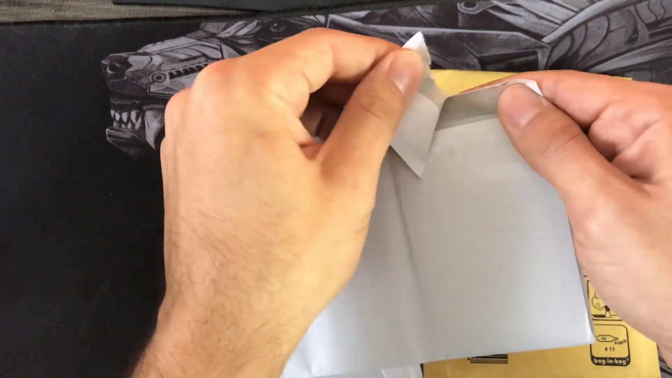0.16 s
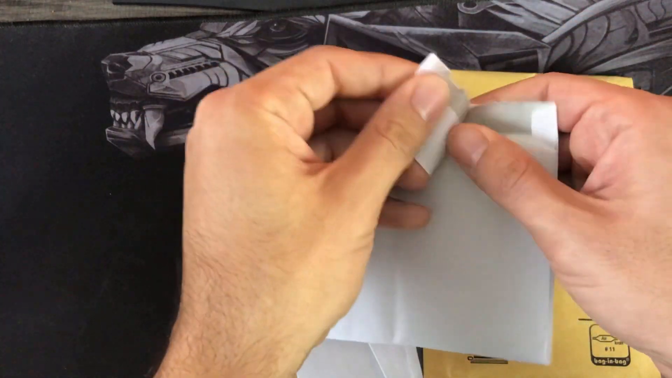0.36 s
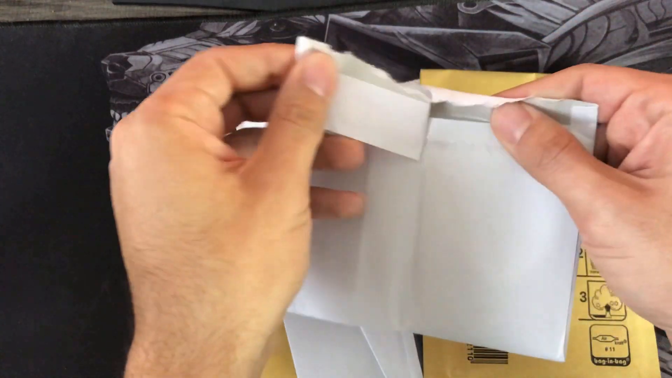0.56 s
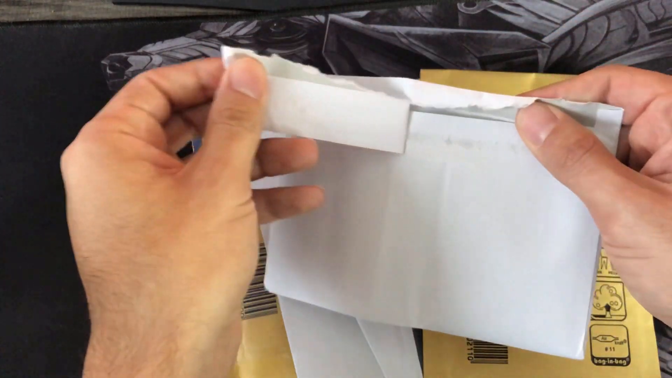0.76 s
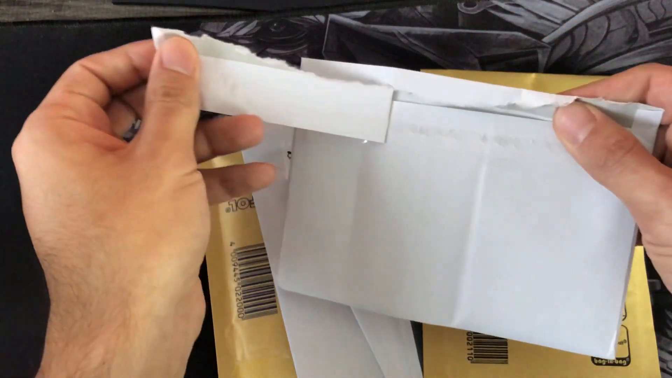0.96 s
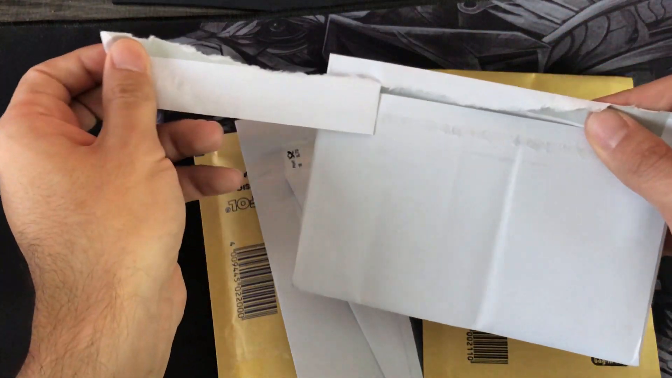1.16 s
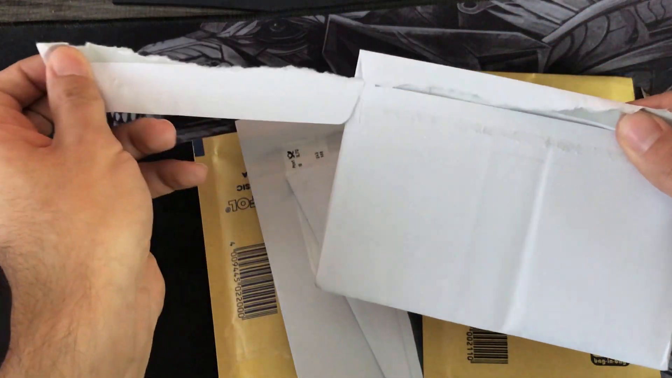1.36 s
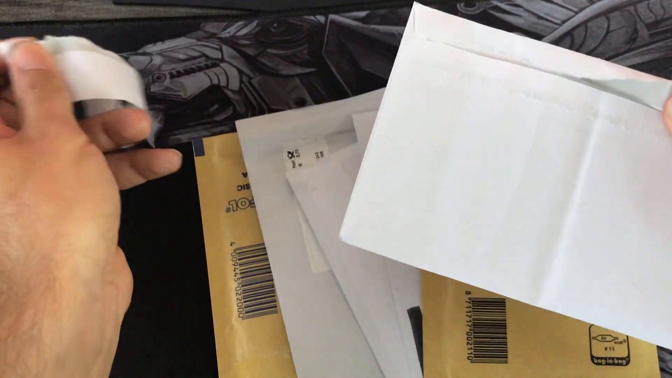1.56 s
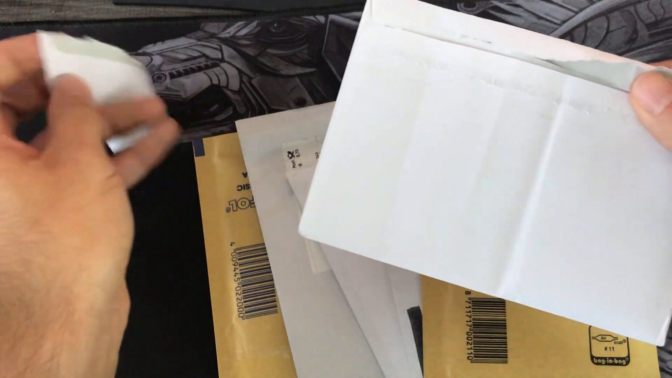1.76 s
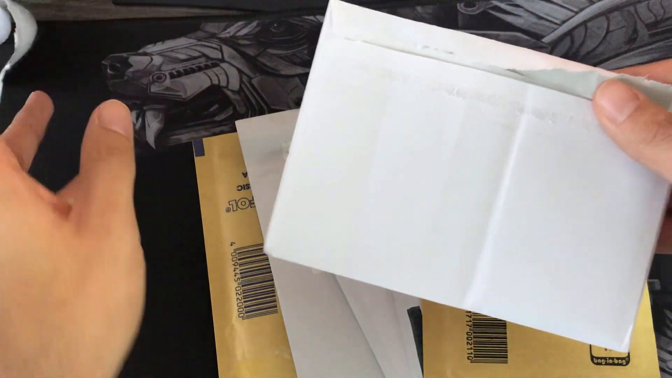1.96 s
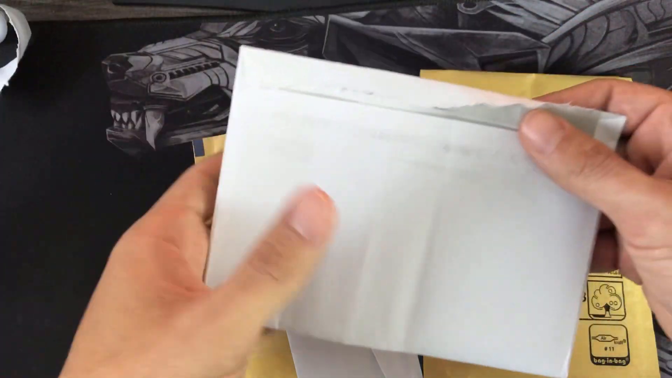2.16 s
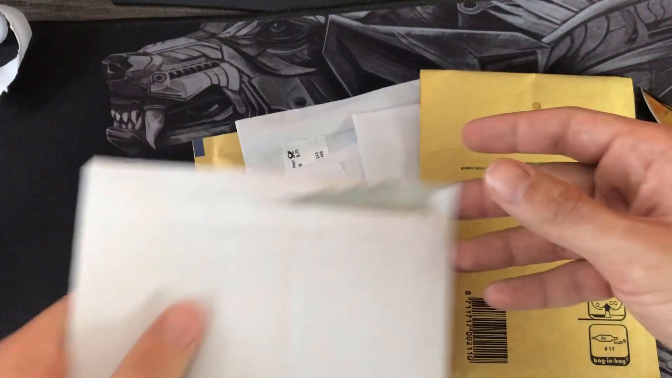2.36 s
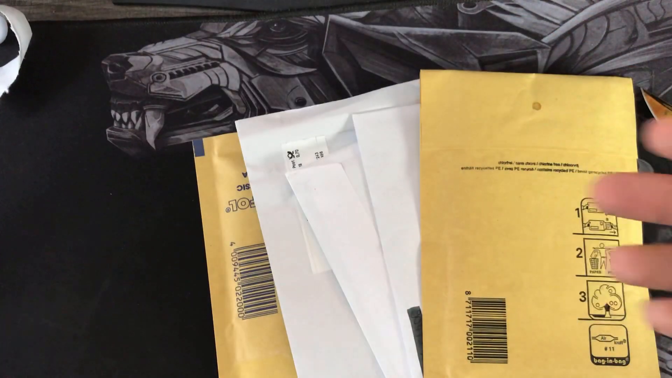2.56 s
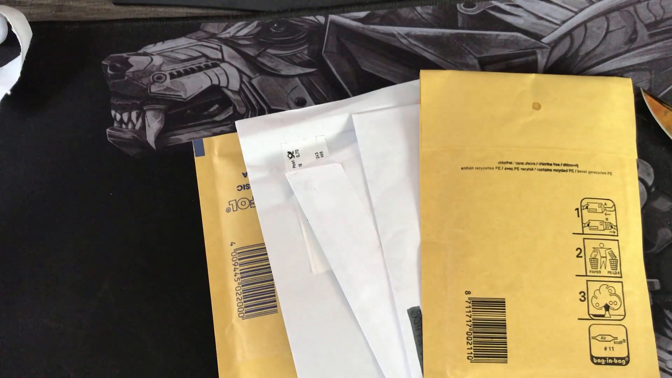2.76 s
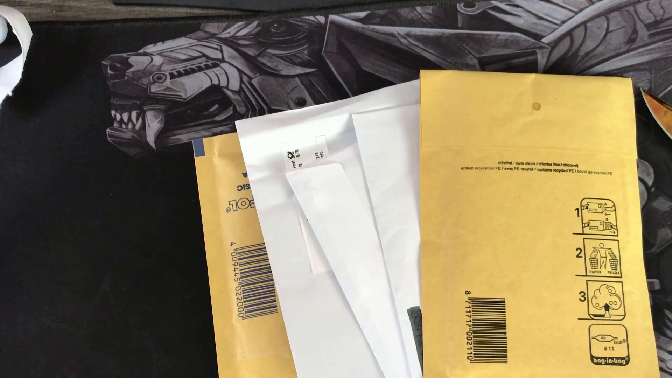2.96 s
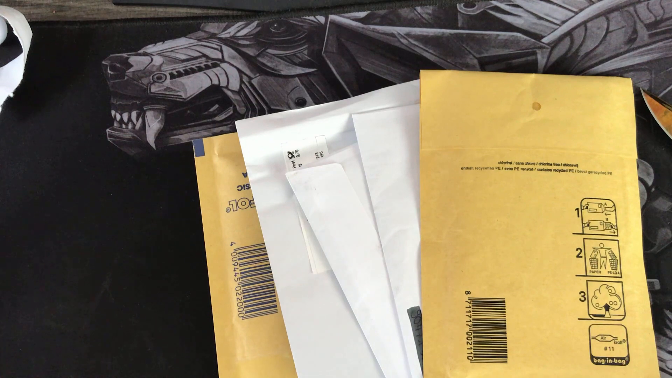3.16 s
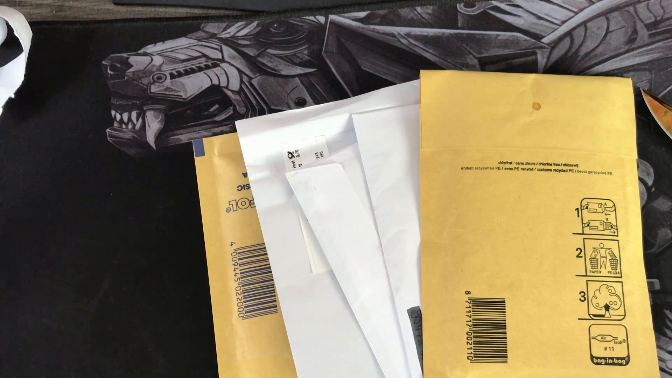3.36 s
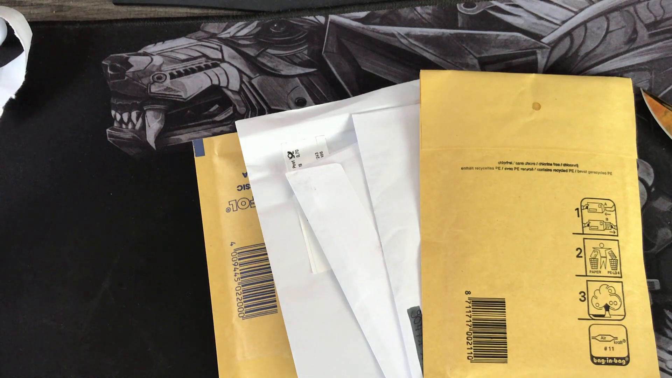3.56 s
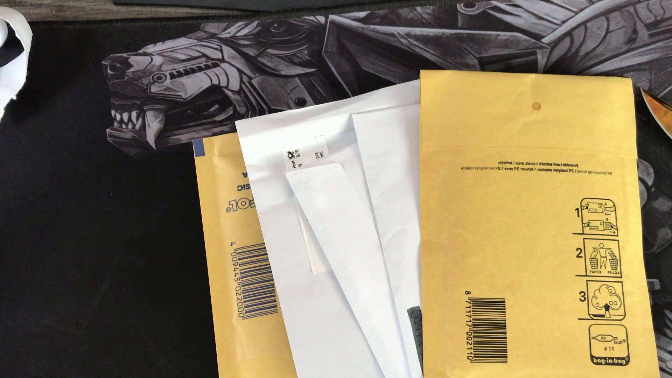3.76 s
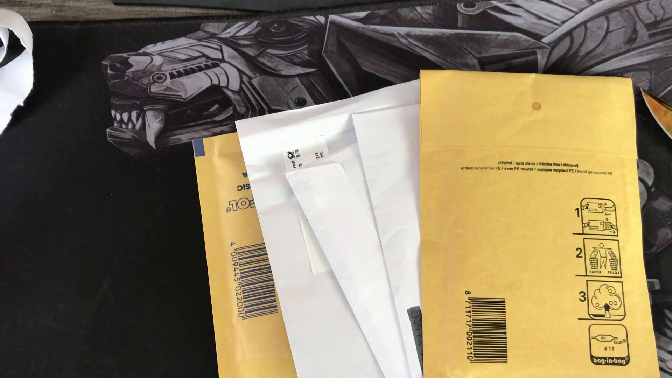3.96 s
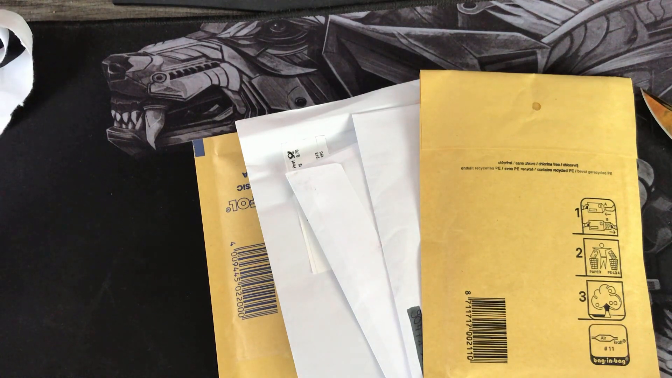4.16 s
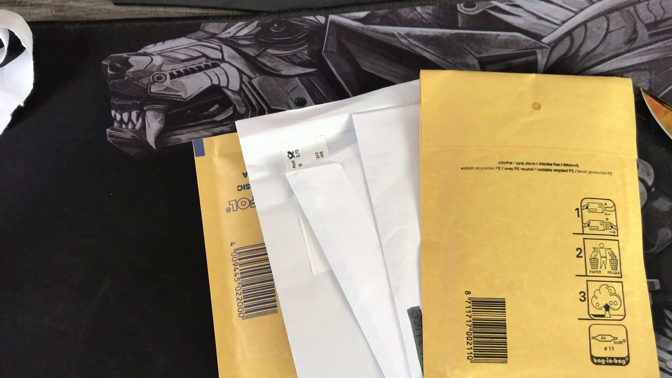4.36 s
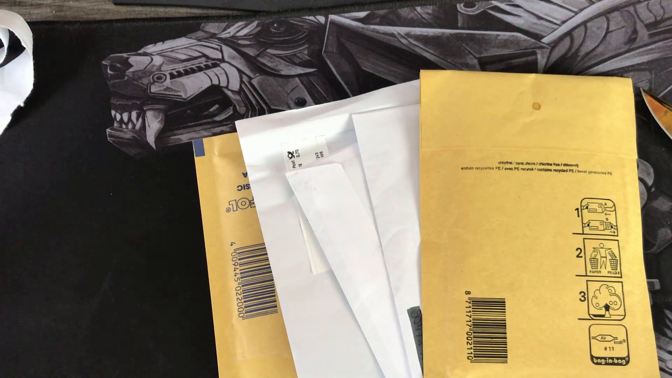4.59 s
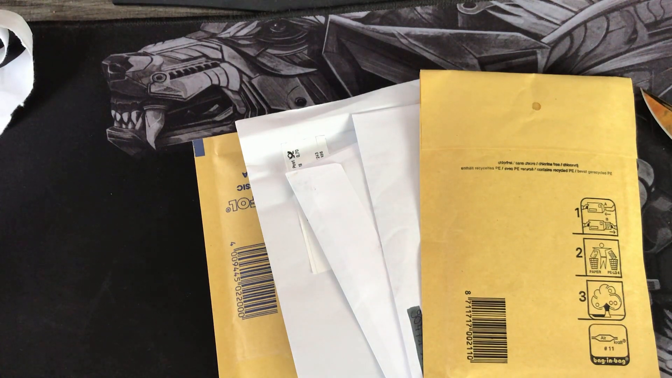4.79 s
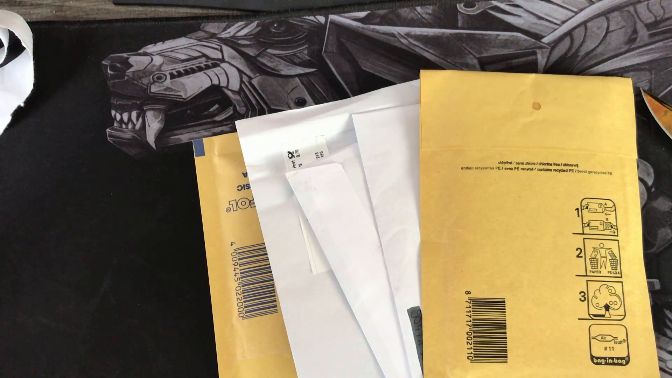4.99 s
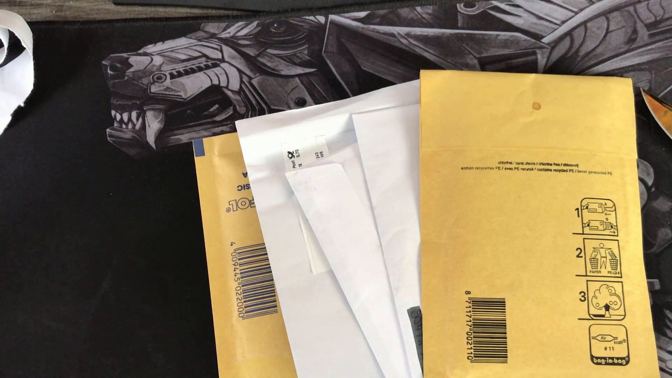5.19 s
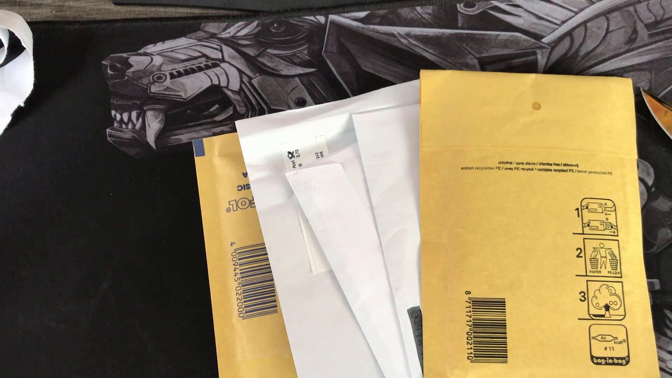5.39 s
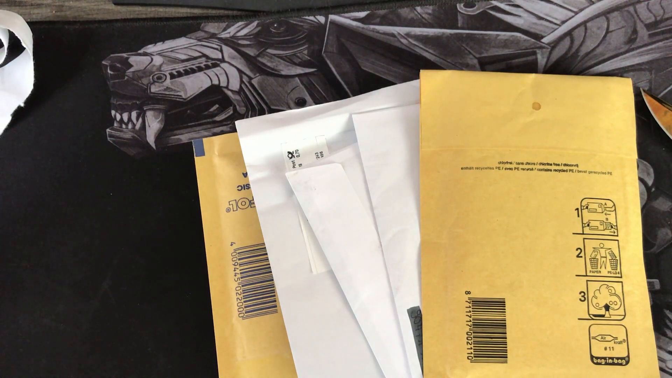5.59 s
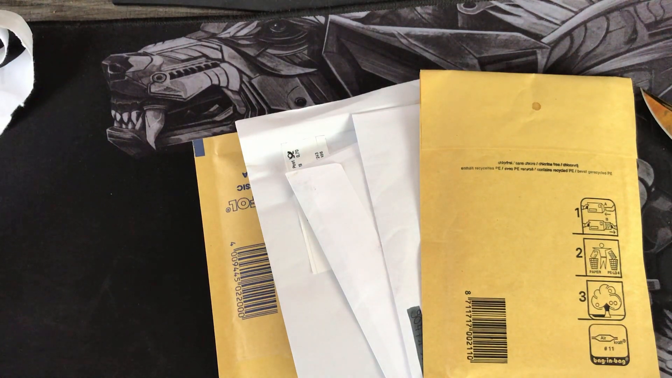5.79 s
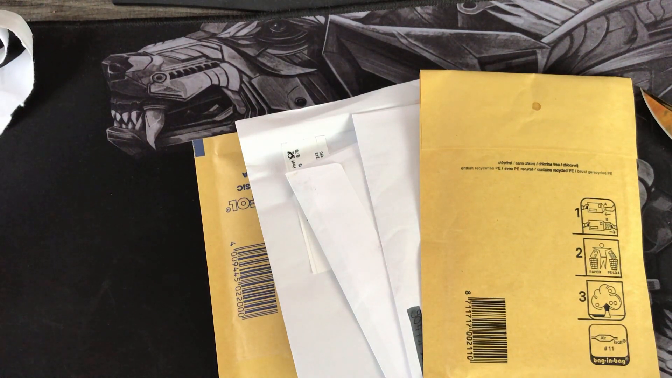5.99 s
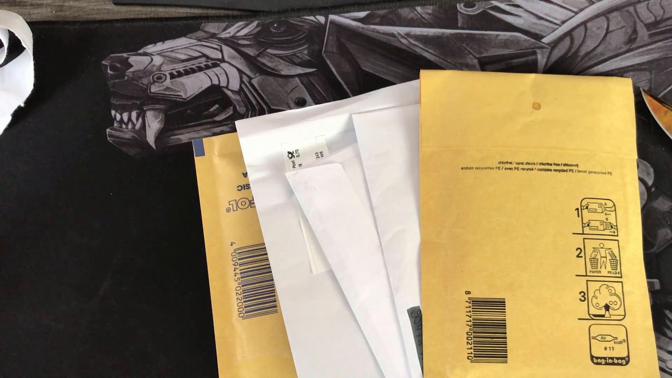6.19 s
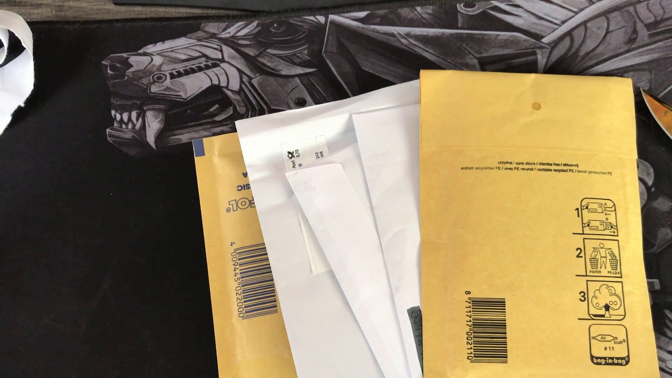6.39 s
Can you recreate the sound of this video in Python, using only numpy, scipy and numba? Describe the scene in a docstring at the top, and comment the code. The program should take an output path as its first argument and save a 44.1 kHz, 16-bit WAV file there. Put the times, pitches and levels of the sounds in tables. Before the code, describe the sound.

A paper envelope flap is torn off in two crackling pulls, then the paper is slid, turned and creased with crisp rustles in a quiet room.

```python
"""On a desk in a small quiet room, the flap of a paper envelope is torn off in two pulls,
with a phone lying there too; then the envelope is turned, slid and creased.
Tearing is a dense crackle of random snaps that rings the loose flap; sliding is smooth hiss with crinkle.
Creases crack in short ringing rattles, hands shake the desk in low sway and jolts,
and the room adds a steady hush and fading echoes."""
import sys
import numpy as np
from scipy import signal
from scipy.fft import rfft, irfft, next_fast_len
from scipy.io import wavfile
from scipy.ndimage import uniform_filter1d
from numba import njit

SR = 44100
rng = np.random.default_rng(int(sys.argv[2]) if len(sys.argv) > 2 else 0)


def unload_wav(signal):
    """Save mono or channel-first audio to the path in sys.argv[1] as 16-bit WAV at rate SR, clipped to [-1, 1]."""
    wavfile.write(
        sys.argv[1],
        SR,
        np.round(np.clip(np.atleast_2d(signal).T, -1, 1) * 32767).astype(np.int16),
    )


N = 284004

# tone balance of the steady room hush: pitch_hz, relative_level_db (per Hz)
HUSH_COLOUR = [(40, -25.5), (70, -5), (150, -3.5), (280, 2), (550, -10.5), (830, -9), (1500, -13),
               (2600, -15.5), (6000, -23.5), (11000, -22.5), (16000, -21.5)]
HUSH_DB = -72.5

# slow sway of the desk under the arms: time_s, level_db
DESK_SWAY = [(0.0, -86), (0.03, -63), (0.18, -54), (0.29, -58), (1.2, -69.5), (2.35, -55), (2.39, -63),
             (2.69, -51.5), (3.26, -68), (4.03, -64.5), (4.41, -72.5), (4.88, -53.5), (4.97, -66.5),
             (5.09, -52), (5.2, -66), (5.35, -59.5), (6.42, -66), (6.44, -74)]
# hands jolting the desk: time_s, push_db (before the desk rings), push_length_ms
DESK_JOLTS = [(0.164, -45, 8.3), (0.254, -57, 9), (0.61, -49.5, 12), (1.067, -54, 11), (1.378, -59.5, 10),
              (2.335, -47, 14), (2.563, -47, 8.8), (2.689, -48.5, 13), (3.136, -55, 9.7), (3.51, -53.5, 6),
              (3.691, -63, 11), (3.827, -59, 5), (4.059, -57, 20), (4.838, -44.5, 16), (4.897, -48.5, 12),
              (4.964, -47, 4.9), (5.088, -43, 14), (5.201, -45, 7), (5.312, -54, 9.3), (5.425, -42.5, 12),
              (5.565, -49, 10), (5.676, -48, 6.4), (5.744, -45, 8), (5.853, -45, 9), (5.913, -48, 7.6),
              (6.011, -44.5, 8.8), (6.121, -48, 6.6), (6.409, -46.5, 6.4)]
# shudder around a jolt: seconds to rise and fall by 20 dB, dB relative to the push
SHUDDER_RISE_S, SHUDDER_FALL_S, SHUDDER_DB = 0.06, 0.091, -13.5
RUMBLE_DB = -76.5  # steady

# sheets rubbing, one row a stroke: loudest_s, hiss_db (skin on paper), crinkle_db (sheet),
# rise_s, fall_s (times for 20 dB)
PAPER_STROKES = [(0.02, -75.5, -71, 1, 0.15), (0.135, -68.5, -79, 0.4, .03), (0.435, -66.5, -71, 0.1, 0.2),
                 (0.52, -64.5, -65, 0.15, 0.7), (1.68, -75.5, -94, 0.1, 0.3), (1.786, -75, -77, 0.1, 0.23),
                 (1.936, -65.5, -75, 0.06, 0.15), (2.309, -68, -62.5, 0, 0.08),
                 (2.35, -69.5, -69.5, -0.02, 0.15), (2.46, -67.5, -74.5, 0.18, 0.08),
                 (2.544, -66.5, -65.5, -0.04, 0.2), (2.574, -67, -62, .08, 0.07),
                 (2.82, -68, -74, 0.24, -0.04), (2.888, -81, -66, 0.3, 0.14),
                 (2.957, -73, -68.5, 0.15, 0.25), (3.12, -71, -78, 0.07, 0.4), (3.174, -71, -61, 0.1, 0.09),
                 (3.497, -66, -63, 0.08, .1), (3.57, -65, -73, 0, 0.5), (3.824, -66, -74, -0.1, 0.18),
                 (3.954, -64.5, -71, 0.02, 0.5), (4.244, -65, -60, 0.12, 0.14),
                 (4.522, -78, -78.5, .1, .12), (4.64, -78, -76.5, -0.2, 0.18),
                 (4.794, -85, -62, 0.03, 0.13), (4.845, -56, -58, .01, 0.18), (4.95, -70, -59, .03, 0.17),
                 (5.058, -62.5, -62, 0.04, 0.2), (5.2, -66.5, -60, 0.11, 0.08),
                 (5.24, -62.5, -61.5, .04, 0.13), (5.422, -61.5, -58.5, 0.1, .1),
                 (5.53, -71, -65, 0.07, 0.35), (5.644, -65.5, -66, .05, -0.1),
                 (5.765, -66.5, -57.5, 0.22, 0.18), (5.868, -57, -56.5, -0.02, .04),
                 (5.912, -70, -58, 0.05, 0.18), (6.02, -62.5, -61.5, .2, 0.23),
                 (6.104, -69, -55.5, 0.12, 0.13), (6.17, -65.5, -72, 0.04, .05),
                 (6.28, -57, -56, 0.08, 0.04), (6.33, -70, -72, 0.4, 0.8), (6.429, -57, -59, 0.05, 1)]
# a crinkle is quicker than its hiss: shares of the stroke's rise and fall times
CRINKLE_RISE, CRINKLE_FALL = 0.48, 0.8
# pitches at which a sheet rings: pitch_hz, width_hz, level_db
SHEET_RINGS = [(1844, 200, -2.5), (2950, 140, -1.5), (3560, 290, -7)]

ROOM_T60_S, ROOM_WET_DB = 0.34, -13.5  # time for echoes to fade by 60 dB, echo level
ROOM_CENTRE_HZ, ROOM_WIDTH_HZ = 3500, 14000  # broad band that dulls the echoes

# creases cracking: start_s, peak_db (of the ring), ring_hz, treble_db and knock_db (relative to peak_db),
# ring_width (share of ring_hz)
CREASE_CRACKS = [(0.162, -25, 6300, 6, -22.5, 1.1), (0.433, -44.5, 2960, 2, -27, 0.36),
                 (0.502, -60, 4230, -9, -8, 0.8), (0.532, -30.5, 4600, -18, -14, 0.6),
                 (1.508, -43, 1650, 2, -9, 1.1), (1.728, -55, 2300, -22, -7, 0.55),
                 (1.758, -58.5, 1110, -11, -1, 0.9), (2.309, -49, 1220, -5, -1, 1.7),
                 (2.316, -57, 1170, -14, 2, 0.8), (2.343, -56.5, 829, -4, -19, 0.8),
                 (2.48, -58.5, 1600, -13, -21, 0.69), (2.54, -45, 1170, -4, -6, 0.54),
                 (2.864, -61, 3830, -13, 0, 0.8), (2.94, -54, 3920, -14, -6, 0.64),
                 (2.999, -55, 1600, -23, -5, 0.8), (3.045, -48, 1850, -19, -2, 0.8),
                 (3.095, -62.5, 929, -4, 11.5, 0.79), (3.133, -41.5, 3200, -8, -8, 0.52),
                 (3.15, -29, 3380, -18, -17, 1.1), (3.184, -48, 1350, -0.5, -1.5, 0.52),
                 (3.312, -61, 2400, 3, -22, 0.61), (3.495, -48.5, 2900, 3, -6.5, 0.56),
                 (3.508, -48.5, 1370, 6, -16, 0.88), (3.554, -46, 3940, -8, -8, 0.8),
                 (3.824, -51, 1970, -2, -23, 1.2), (4.014, -54, 3530, 4, -23, 0.8),
                 (4.04, -49.5, 1810, -15, -14, 0.63), (4.065, -54, 5160, -1, -6.5, 1),
                 (4.239, -41.5, 1700, -4, -11.5, 1.0), (4.285, -50.5, 3310, -18, -9, 0.8),
                 (4.672, -58.5, 2950, -18, -3, 0.67), (4.789, -41, 1350, -30, -4, 0.61),
                 (4.833, -25.5, 3000, -3, -17.5, 1.4), (4.949, -33, 1420, -12, -9.5, 0.44),
                 (4.958, -30, 3050, -19, -8, 1), (5.09, -46.5, 1790, -6.5, 1.5, 0.61),
                 (5.198, -35.5, 1860, -35, -9.5, 0.3), (5.234, -47, 1700, -20, -5, 0.8),
                 (5.312, -49, 2150, -22.5, -21, 0.92), (5.416, -50, 2050, 5, -21, 0.71),
                 (5.449, -47.5, 2340, -2, -10, 0.5), (5.634, -50.5, 3060, -11, -9, 0.66),
                 (5.762, -43.5, 1850, -12, -0.5, 0.74), (5.867, -44, 6900, 3.5, -9, 0.79),
                 (5.907, -32.5, 2360, -38, -16, 0.44), (5.949, -44, 1240, -19, -7, 1),
                 (6.036, -51, 1800, -19, -11, 0.9), (6.048, -37.5, 1730, -20, -8.5, 1.2),
                 (6.099, -35.5, 1730, -29, -22, 0.65), (6.106, -34.5, 1840, -7.5, -7, 0.28),
                 (6.282, -33, 1820, -2, -17, 0.23), (6.387, -38, 1320, -27, -33, 0.22)]
CRACK_DECAY_MS = 2

# the two pulls, one list each: time_s, hiss_db (fibres), body_db (flap, relative to hiss),
# flap_ring_hz, upper_ring_db (relative to hiss)
TEAR_PULLS = [
    [(0.165, -40, -12, 2000, -20), (0.175, -42.5, -21, 1900, -15), (0.203, -43, -1.5, 1480, -5),
     (0.24, -42.5, -6, 1460, -8.5), (0.303, -61.5, -3.5, 1570, -15), (0.42, -77.5, -6, 1700, -4)],
    [(0.535, -46.5, -6.5, 2680, -19), (0.569, -42.5, -12, 3270, -9), (0.615, -41.5, -13, 3460, 2),
     (0.665, -42.5, -9, 3200, -6), (0.713, -47.5, -8.5, 2690, -8), (0.82, -49, -10, 1740, -18),
     (0.87, -45.5, -5.5, 1320, -19), (0.934, -45.5, -7.5, 1300, -19), (0.982, -48, -11.5, 1380, -24),
     (1.09, -46.5, -7, 1380, -18), (1.13, -44.5, -11.5, 2770, -10), (1.2, -48, -13.5, 3100, -12.5),
     (1.29, -46.5, -11, 2020, -14), (1.394, -45.5, -9, 2000, -16), (1.44, -51.5, -9.5, 2300, -13),
     (1.52, -59, -7.5, 1780, -11), (1.6, -80, -4.5, 1800, -8)],
]
# tone balance of the snapping fibres: pitch_hz, relative_level_db (per Hz)
FIBRE_COLOUR = [(1470, -13), (2500, -15.5), (4690, -2.5), (6060, -3.5), (7420, -0.5), (13900, -6),
                (16000, -14)]
# ringing air and faces of the envelope: pitch_hz, width_hz, level_db
POCKET_RINGS = [(293.3, 25, 2.5), (466, 28, 0.5), (860, 97, -4)]
TORN_EDGE_HZ = 7230

PHONE_TOP_HZ = 15850


def undb(db):
    """Turn decibels into a gain."""
    return 10 ** (np.asarray(db) / 20)


def unit(x):
    """Scale a sound to an average (rms) level of 1."""
    return x / np.sqrt(np.mean(x ** 2))


@njit
def svf(x, hz, width):
    """Let through a band whose centre may move; two linked stores of energy give gain 1 at the centre."""
    y, b, l = np.empty(len(x)), 0., 0.
    for i in range(len(x)):
        g = np.tan(np.pi * hz[i] / SR)
        k = width[i] / hz[i]
        v = (b + g * (x[i] - l)) / (1 + g * (g + k))
        b, l, y[i] = 2 * v - b, l + 2 * g * v, k * v
    return y


def ring(x, hz, width_hz):
    """Let an object ring at one pitch; a narrower width rings for longer."""
    one = np.ones(len(x))
    pitch = np.clip(hz * one, 10., SR * .4)
    return svf(x + 1e-18, pitch, width_hz * one)  # the tiny offset keeps values off exact zero


def rings(x, table):
    """Add up several rings of one object, each with its own pitch, width and level."""
    return sum(undb(db) * ring(x, hz, width_hz) for hz, width_hz, db in table)


def colour(x, points):
    """Set the balance of low and high pitches by a table, then scale to level 1."""
    hz, db = np.transpose(points)
    size = next_fast_len(len(x))
    f = np.arange(size // 2 + 1) * SR / size + 1  # the 1 avoids log(0)
    gain = undb(np.interp(np.log(f), np.log(hz), db))
    return unit(irfft(rfft(x, size) * gain, size)[:len(x)])


def track(tables):
    """Draw table columns along time, with a gate open only during each table."""
    t = np.arange(N) / SR
    s, *columns = np.transpose(np.vstack(tables))
    curves = [np.interp(t, s, c) for c in columns]
    is_open = sum((t >= rows[0][0]) & (t <= rows[-1][0] + .03) for rows in tables) > 0
    return uniform_filter1d(is_open * 1., 64), curves  # softened gate edges


def walk(rate):
    """Wander between random levels, `rate` new ones a second; spread just under 1."""
    k = int(SR / rate)
    held = np.repeat(rng.standard_normal(N // k + 1), k)
    return uniform_filter1d(held, k)[:N]


def grains(per_s, spread_db, share):
    """Mix random snaps of scattered, limited size with fine noise; share is the snaps' part of the power."""
    size_db = spread_db * np.minimum(rng.exponential(size=N), 3)
    happens = rng.random(N) < per_s / SR
    snaps = happens * undb(size_db) * np.sign(rng.standard_normal(N))
    share = np.clip(share, 0, 1)
    return np.sqrt(share) * unit(snaps) + np.sqrt(1 - share) * rng.standard_normal(N)


def swells(times, levels_db, rises, falls):
    """Add the power of events that grow to a peak and die away at steady rates in dB."""
    t = np.arange(N) / SR
    power = 0
    for s, db, rise, fall in np.broadcast(times, levels_db, rises, falls):
        # 20 dB takes at least 3 ms, even where the table time is zero or negative
        before, after = (s - t) / max(rise, .003), (t - s) / max(fall, .003)
        power = power + undb(2 * (db - 20 * np.where(t < s, before, after)))
    return np.sqrt(power)


def hush():
    """Steady random noise, given the room's tone balance."""
    return undb(HUSH_DB) * colour(rng.standard_normal(N), HUSH_COLOUR)


def desk():
    """Hands push the desk: low sway, jolts and a dull shudder are carried up to the phone."""
    _, (sway_db,) = track([DESK_SWAY])
    s, push_db, _ = np.transpose(DESK_JOLTS)
    t = np.arange(N) / SR
    sway = unit(ring(ring(ring(rng.standard_normal(N), 5.4, 24.8), 12., 27.0), 5.6, 55.0))
    dull = unit(ring(ring(rng.standard_normal(N), 50., 70.7), 70., 180.0))
    dull = dull * undb(1.7 * walk(30))
    # each push is a smooth bump; half its length in ms, turned to seconds, sets the width
    pushes = sum(undb(db) * np.exp(-((t - at) / (ms / 2e3)) ** 2) for at, db, ms in DESK_JOLTS)
    shudder = swells(s, push_db + SHUDDER_DB, SHUDDER_RISE_S, SHUDDER_FALL_S)
    dull_level = undb(RUMBLE_DB) + shudder
    return undb(sway_db) * sway + ring(pushes, 35., 120.) + dull_level * dull


def slide():
    """Rubbing makes a smooth friction hiss, and a faint crinkle that rings the sheet."""
    s, hiss_db, crinkle_db, rise, fall = np.transpose(PAPER_STROKES)
    hiss = unit(ring(grains(per_s=1400, spread_db=3.5, share=0.27), 8360.0, 11000.0))
    hiss = hiss * undb(1.9 * walk(44))
    ticks = grains(per_s=300, spread_db=2.0, share=0.29) * undb(3.8 * walk(90))
    crinkle = unit(ring(ticks, 1200.0, 2500.0)) + undb(-10.5) * unit(rings(ticks, SHEET_RINGS))
    hiss_level = swells(s, hiss_db, rise, fall)
    crinkle_level = swells(s, crinkle_db, CRINKLE_RISE * rise, CRINKLE_FALL * fall)
    return hiss_level * hiss + crinkle_level * crinkle


def patchy(x, depth_db, rate):
    """A bending sheet gives off sound unevenly: narrow bands swell and fade on their own."""
    bands = 500 * 2 ** (np.arange(24) / 5)  # five bands per octave
    return x + sum((undb(depth_db * walk(rate)) - 1) * ring(x, hz, hz / 9) for hz in bands)


def room(x):
    """Walls return dense fading echoes, duller than the source, that build up over a few ms."""
    t = np.arange(int(.6 * SR)) / SR
    fade = np.exp(-np.log(1000) * t / ROOM_T60_S)
    onset = 1 - np.exp(-(t / 0.002) ** 2)
    tail = ring(rng.standard_normal(len(t)) * fade * onset, ROOM_CENTRE_HZ, ROOM_WIDTH_HZ)
    tail = tail / np.sqrt(np.sum(tail ** 2))
    return undb(ROOM_WET_DB) * signal.fftconvolve(x, tail)[:N]


def peak(x):
    """Scale a sound so its highest point is 1."""
    return x / np.abs(x).max()


def cracks():
    """A crease gives way in a short rattle of slips with a ring, a bright edge and a knock."""
    out = np.zeros(N + SR)
    t = np.arange(int(.04 * SR)) / SR
    age = t / 1e-3 / CRACK_DECAY_MS
    shape = (1 - np.exp(-age / 0.33)) * np.exp(-age)
    for s, db, hz, treble_db, knock_db, wide in CREASE_CRACKS:
        rattle, edge = rng.standard_normal((2, len(t)))
        tone = peak(ring(ring(shape * rattle, hz, max(wide, .1) * hz), hz, 2.24 * hz))
        bright = peak(ring(ring(shape * edge, 7600.0, 9000.), 8000., 12000.))
        knock = peak(ring(ring(shape * (1 + 1.5 * edge), 484.0, 500.), 340.0, 902.0))
        i = int(s * SR)
        out[i:i + len(t)] += undb(db) * (tone + undb(treble_db) * bright + undb(knock_db) * knock)
    return out[:N]


def tear():
    """Fibres part in a dense uneven crackle that rings the flap, its torn edge and the pocket."""
    gate, (hiss_db, body_db, flap_hz, upper_db) = track(TEAR_PULLS)
    # the pull stutters, so fine fibres and coarser glued spots let go in shared bunches
    stutter = undb(0.99 * walk(500) + 1.42 * walk(89.9))
    fine = stutter * grains(per_s=2000, spread_db=1.5, share=0.49)
    coarse = stutter * grains(per_s=1200, spread_db=2.0, share=0.43)
    upper_snaps = stutter * grains(per_s=1500, spread_db=5.0, share=.5)

    torn_edge = unit(ring(fine, TORN_EDGE_HZ, 1407.0))
    hiss = colour(fine, FIBRE_COLOUR) + undb(-16) * torn_edge
    body = unit(ring(ring(coarse, 1290.0, 1650.0), 1270.0, 2000.0))
    flap = unit(ring(coarse, flap_hz, flap_hz / 7))
    pocket = unit(rings(coarse, POCKET_RINGS))
    low = body + undb(-15) * flap + undb(-9) * pocket
    upper = unit(ring(ring(upper_snaps, 3370.0, 901.0), 3330.0, 1300.))
    return gate * undb(hiss_db) * (hiss + undb(body_db) * low + undb(upper_db) * upper)


def scene():
    """Add the paper and its echoes, the shaken desk and the room hush."""
    paper = patchy(tear() + slide(), depth_db=3.5, rate=18) + cracks()
    return (paper + room(paper) + desk() + hush())[None]


def record(dry):
    """The phone steeply cuts the highest pitches."""
    top_cut = signal.ellip(10, .2, 70, PHONE_TOP_HZ, fs=SR, output="sos")
    return signal.sosfilt(top_cut, dry)


dry = scene()
out = record(dry)
unload_wav(out)
```